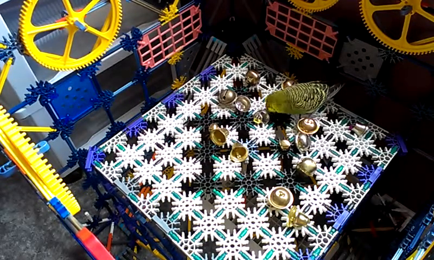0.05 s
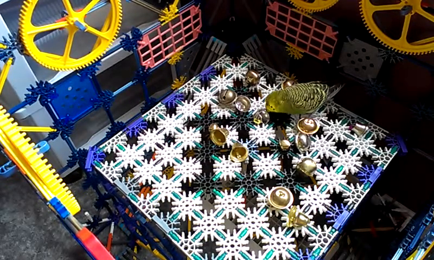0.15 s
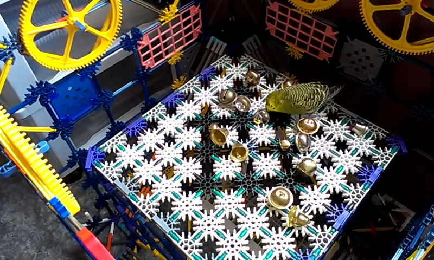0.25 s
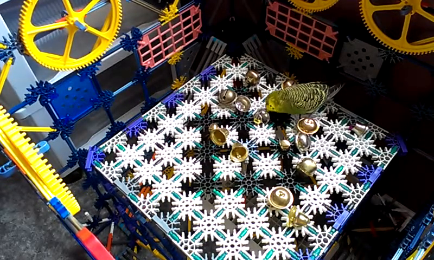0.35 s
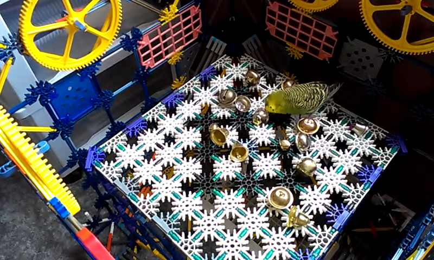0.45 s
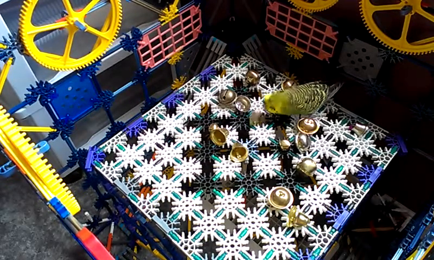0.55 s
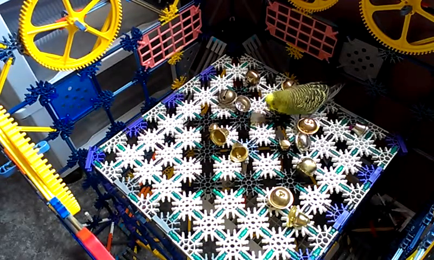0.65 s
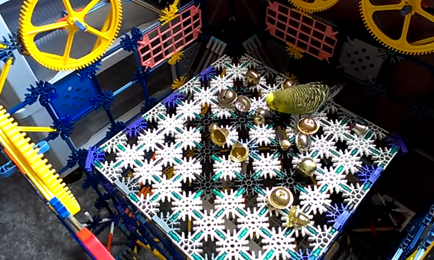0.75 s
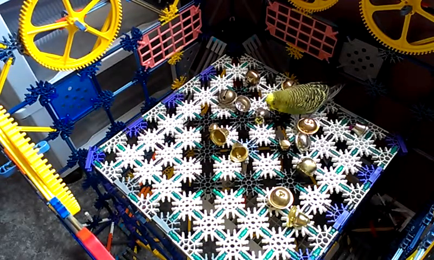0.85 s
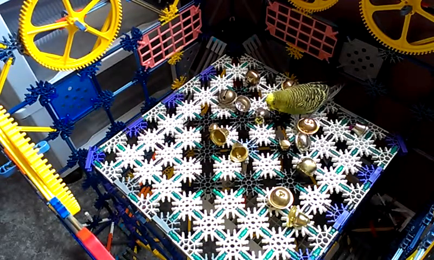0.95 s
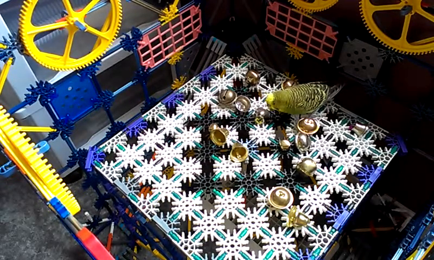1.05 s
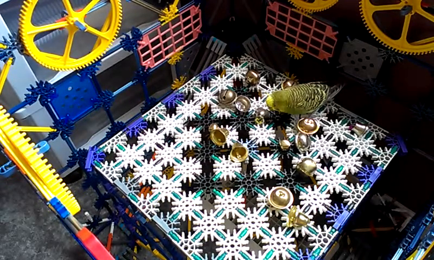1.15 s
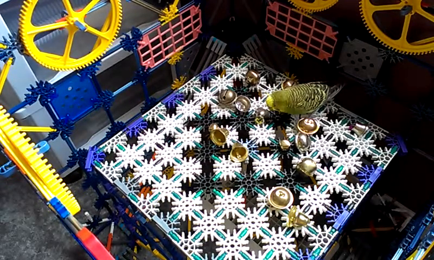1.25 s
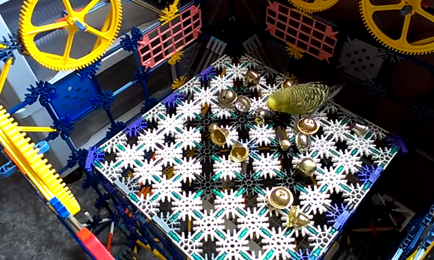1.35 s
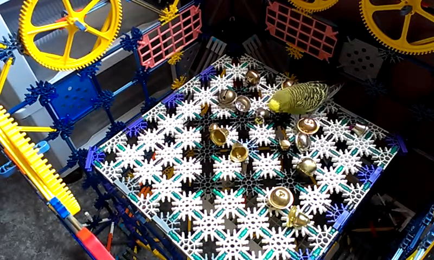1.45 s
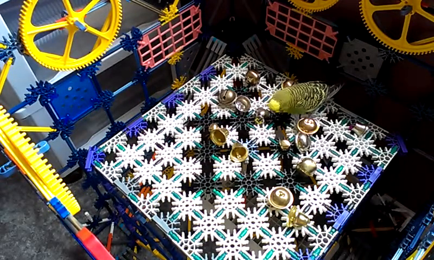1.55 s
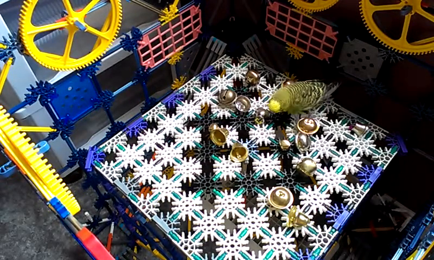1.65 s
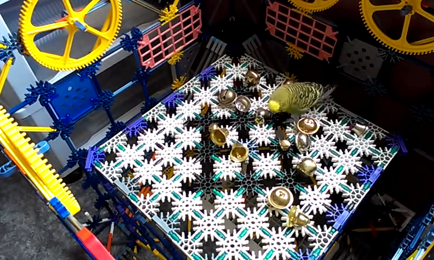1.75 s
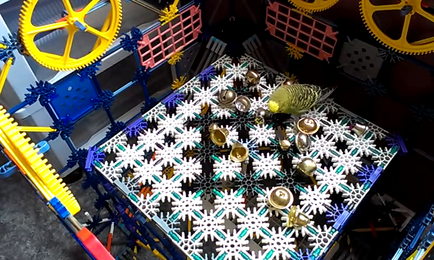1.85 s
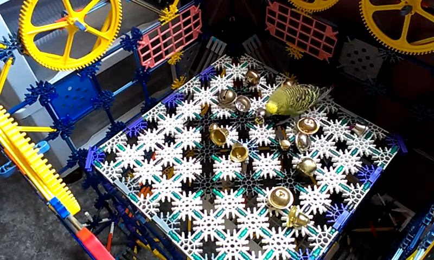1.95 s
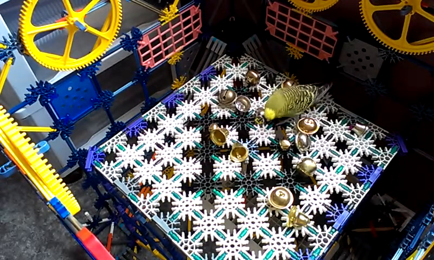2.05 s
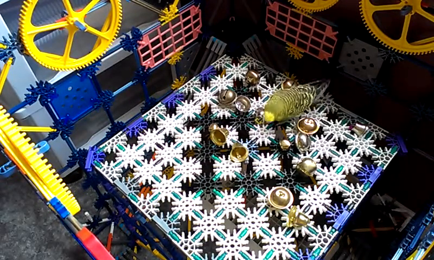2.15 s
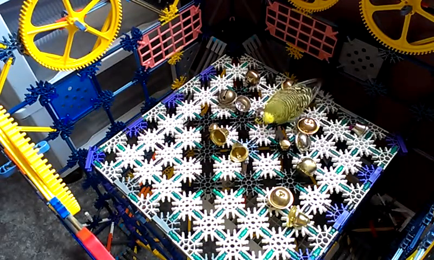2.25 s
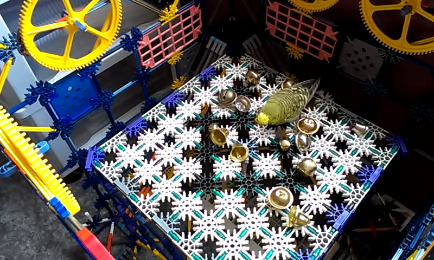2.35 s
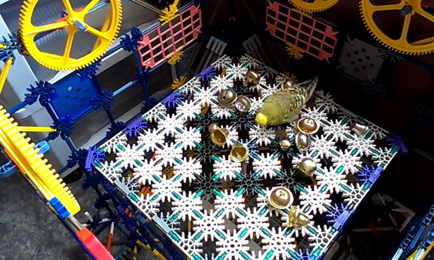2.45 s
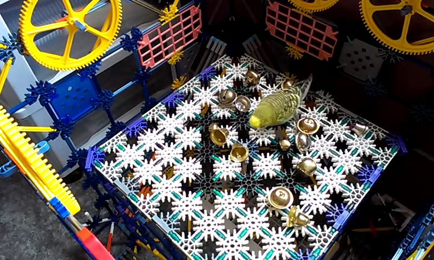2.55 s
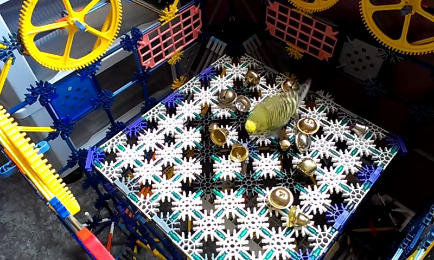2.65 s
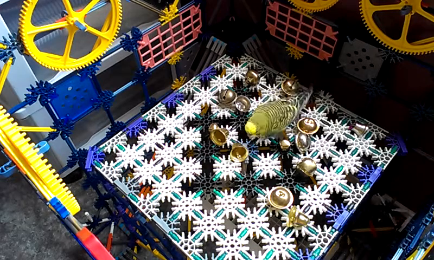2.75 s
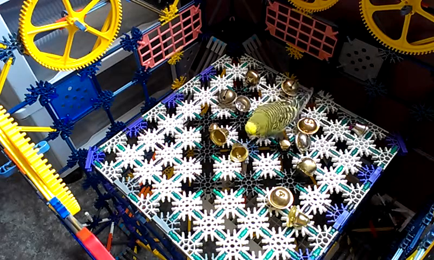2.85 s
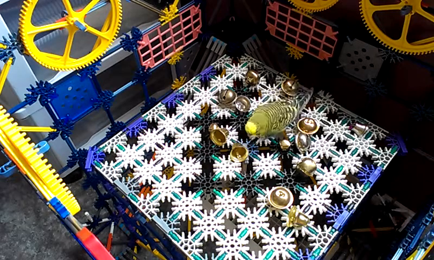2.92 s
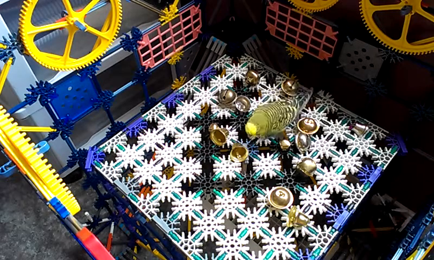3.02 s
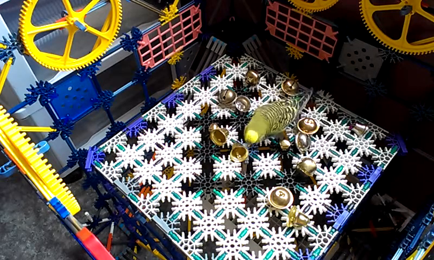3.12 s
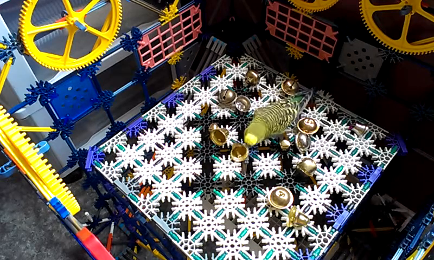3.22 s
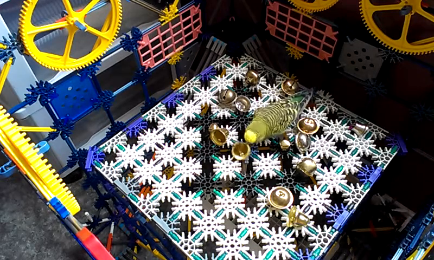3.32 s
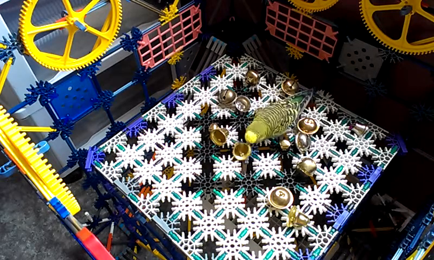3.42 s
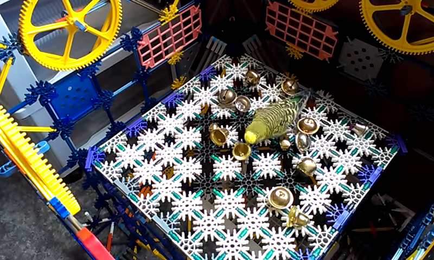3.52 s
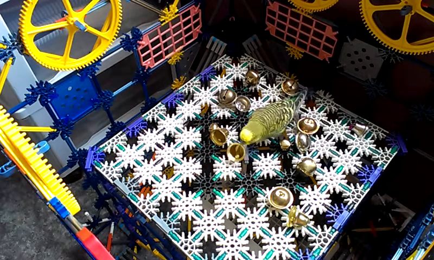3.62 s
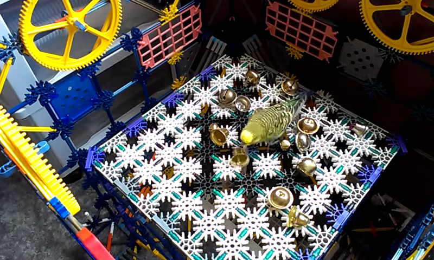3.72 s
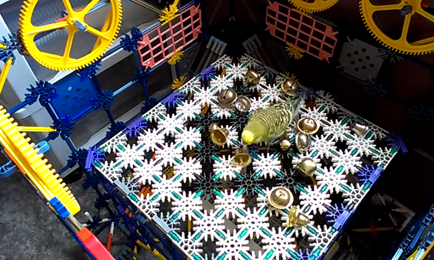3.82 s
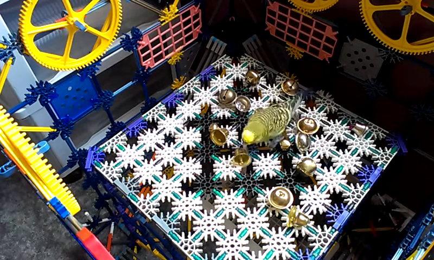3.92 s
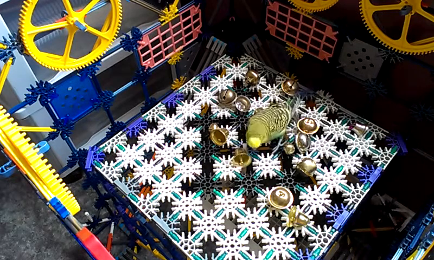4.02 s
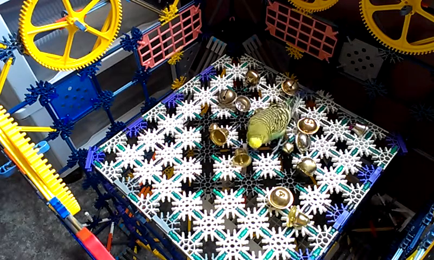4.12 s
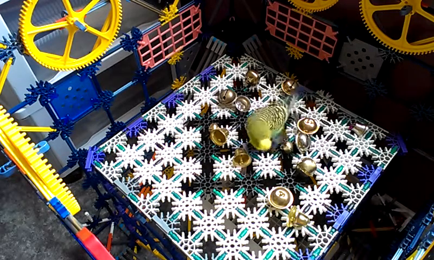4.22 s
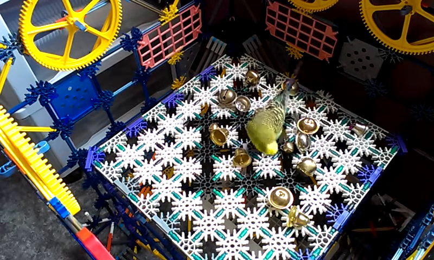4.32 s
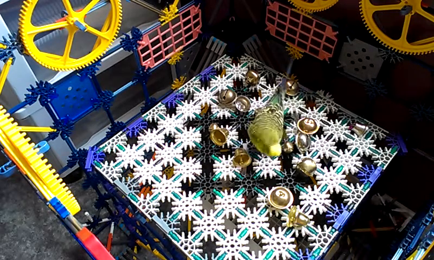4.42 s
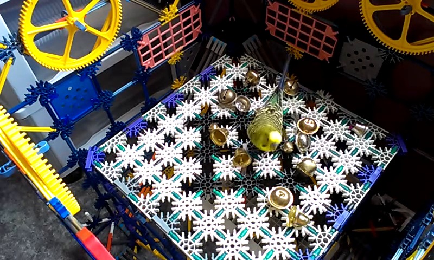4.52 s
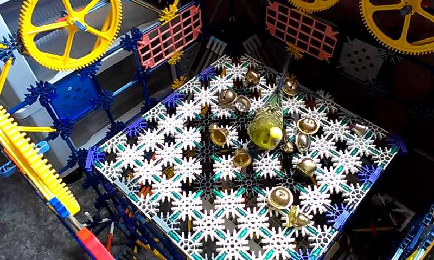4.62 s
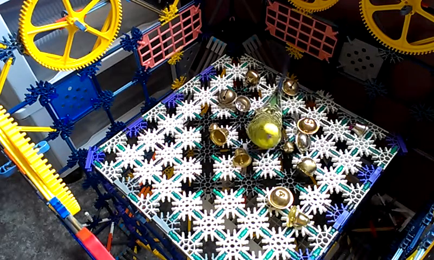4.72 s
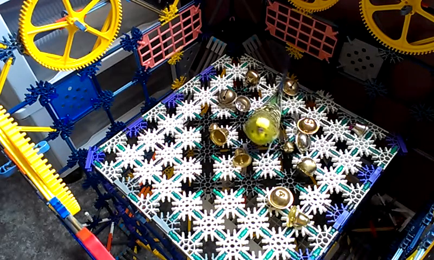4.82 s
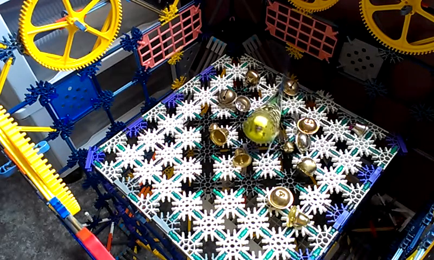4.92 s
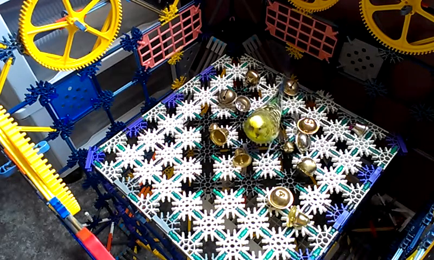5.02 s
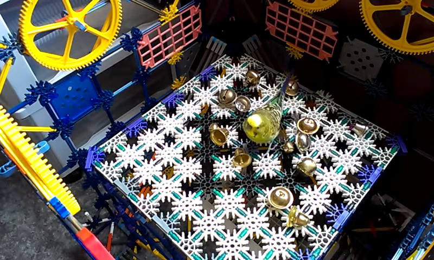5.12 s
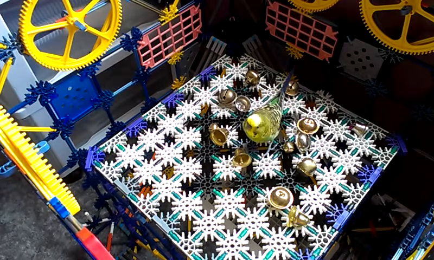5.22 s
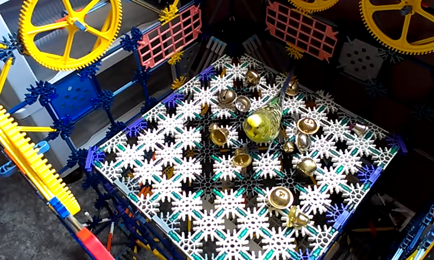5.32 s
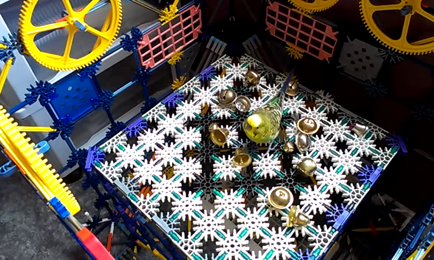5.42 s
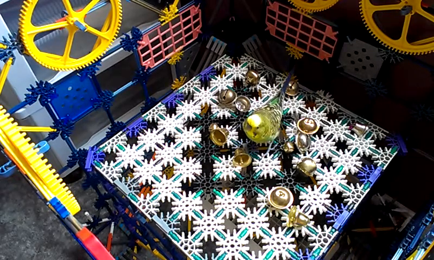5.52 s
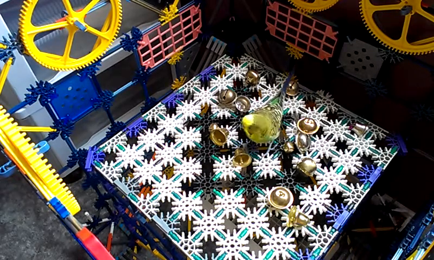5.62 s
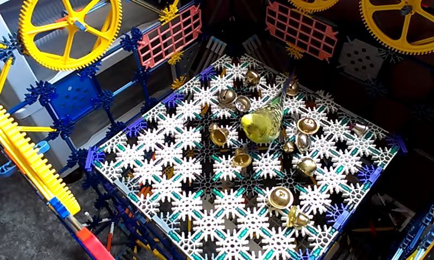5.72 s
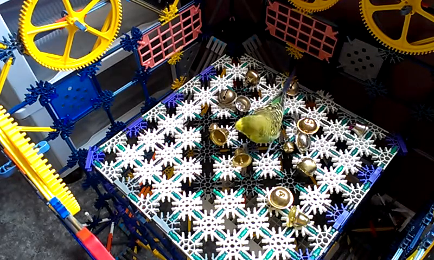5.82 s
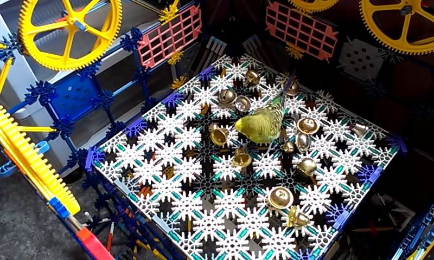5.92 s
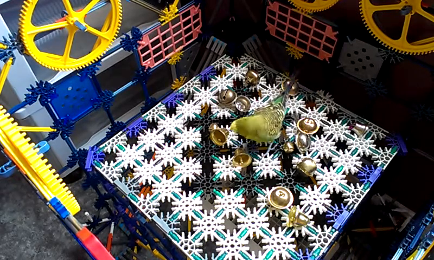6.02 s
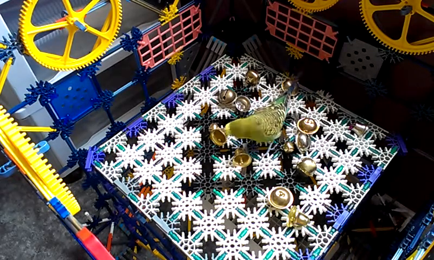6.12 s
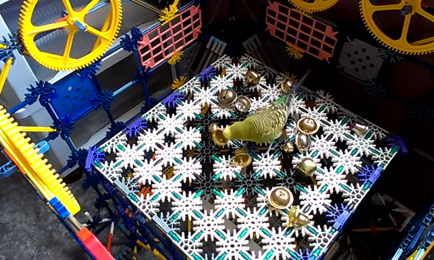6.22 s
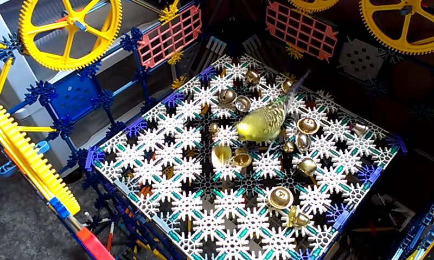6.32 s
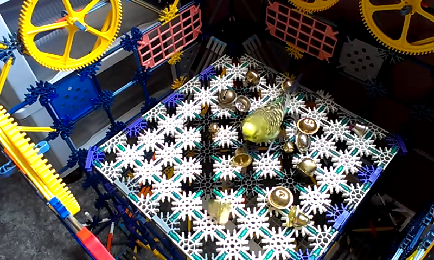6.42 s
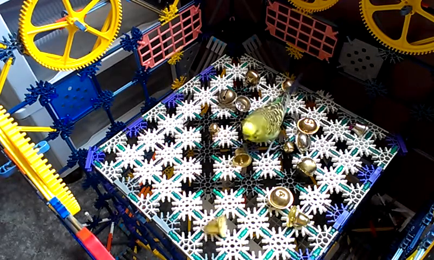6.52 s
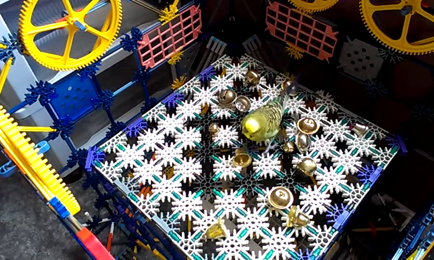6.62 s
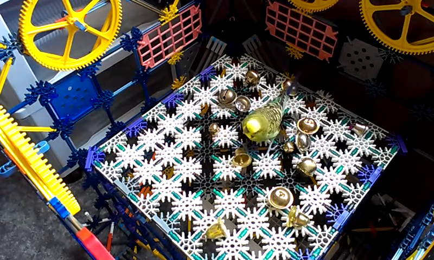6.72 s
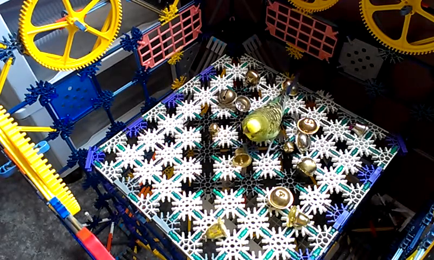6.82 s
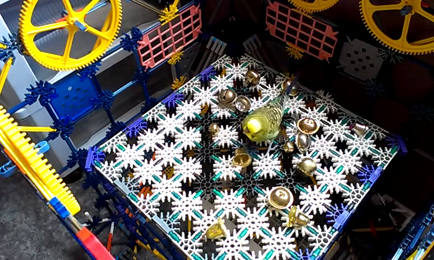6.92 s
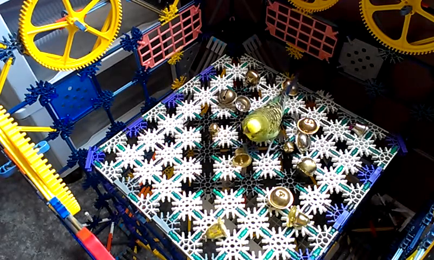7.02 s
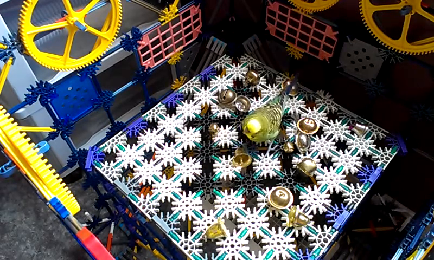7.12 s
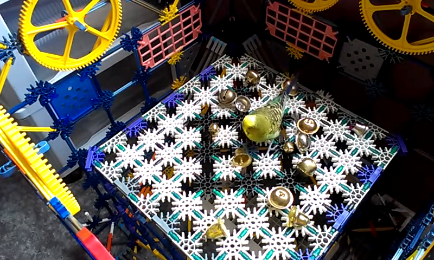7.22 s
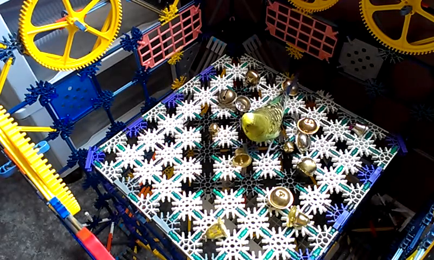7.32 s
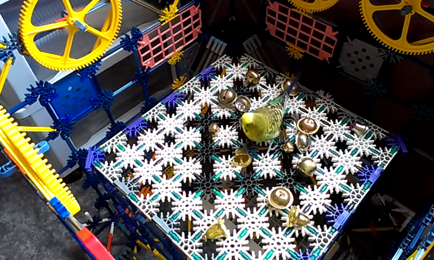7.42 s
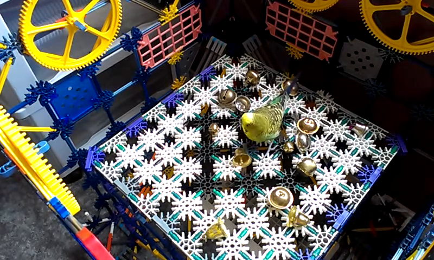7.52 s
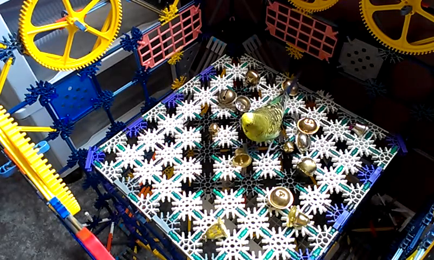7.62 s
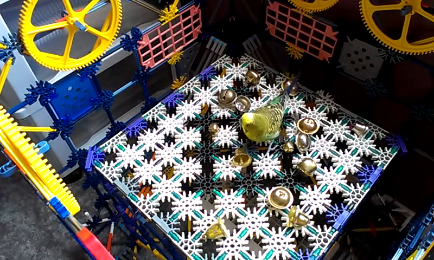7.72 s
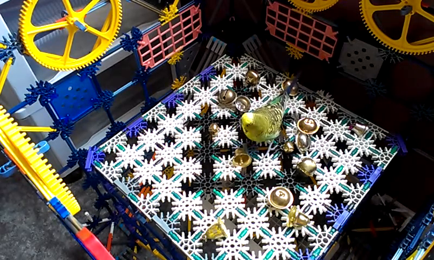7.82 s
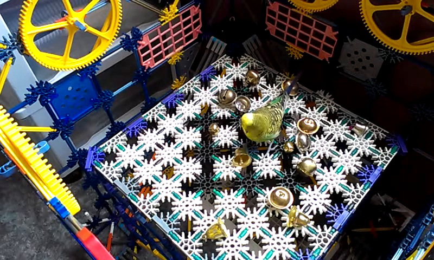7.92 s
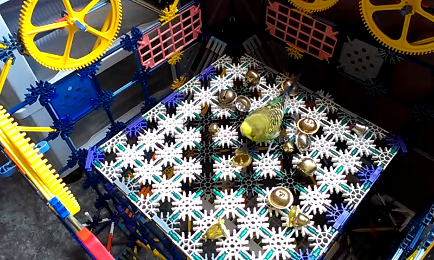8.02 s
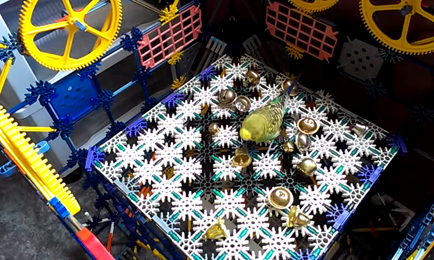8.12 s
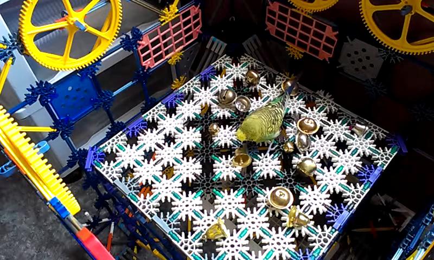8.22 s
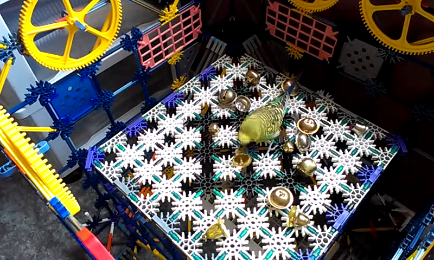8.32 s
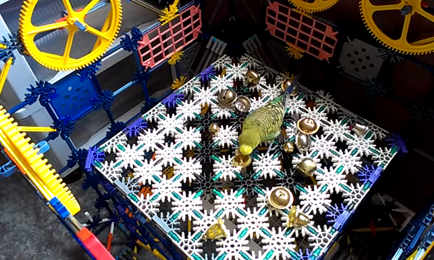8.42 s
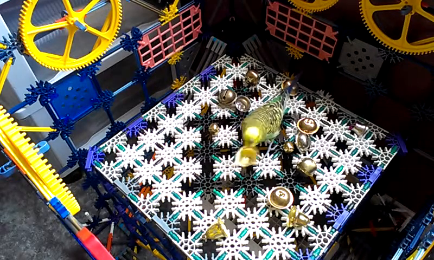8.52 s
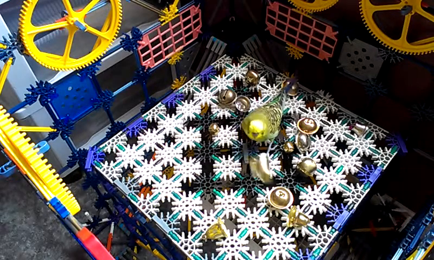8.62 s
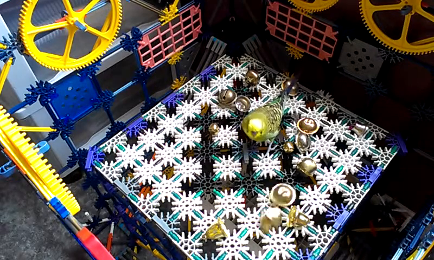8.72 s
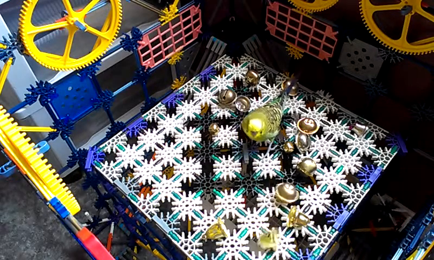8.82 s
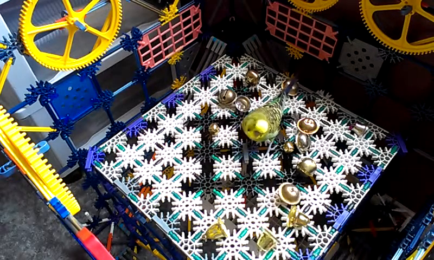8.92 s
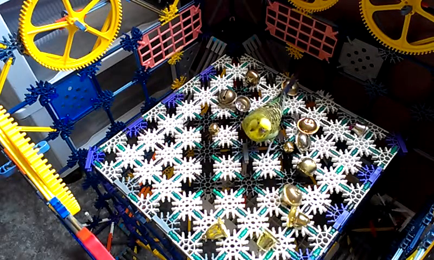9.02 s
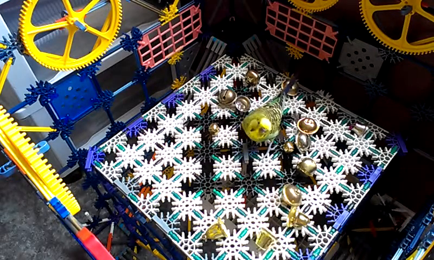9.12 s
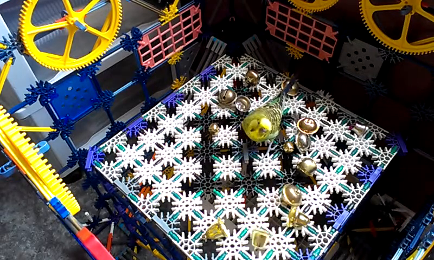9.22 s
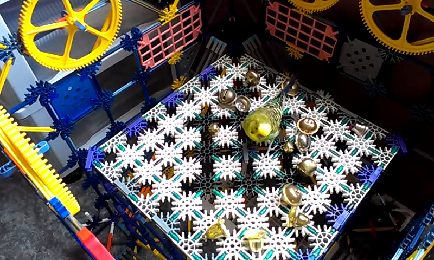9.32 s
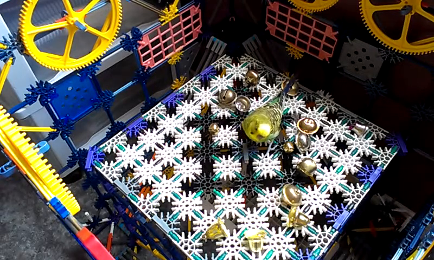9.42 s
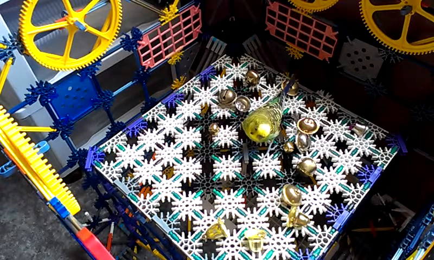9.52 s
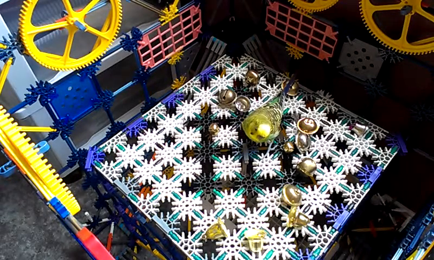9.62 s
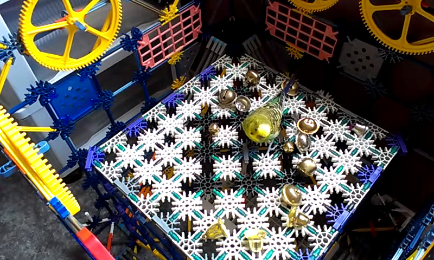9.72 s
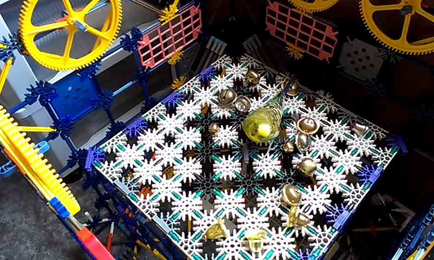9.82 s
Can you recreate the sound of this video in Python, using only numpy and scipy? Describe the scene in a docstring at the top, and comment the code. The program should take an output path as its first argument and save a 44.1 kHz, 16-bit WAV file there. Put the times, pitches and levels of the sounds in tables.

```python
"""A quiet room hushes and hums, and soon a small parrot knocks little brass bells about on a hollow plastic grid.
Each knock is a noise tick, a grainy clatter of the grid and a dull thump; heavy landings shake the frame.
Brass clinks are spikes with a short fizz. Three round pellet bells tinkle short and two open bells ring in
beating pairs, all as fading sine waves. Far traffic is a wavering rush with a drone that swells and fades."""
import sys
import numpy as np
from scipy import signal
from scipy.fft import rfft, irfft, next_fast_len
from scipy.io import wavfile
from scipy.ndimage import uniform_filter1d

SR = 44100
rng = np.random.default_rng(int(sys.argv[2]) if len(sys.argv) > 2 else 0)


def unload_audio(sound):
    """Save the sound as a 16-bit wav file, at the path given as the first command line argument."""
    columns = np.transpose(np.atleast_2d(sound))
    # keep every value between -1 and 1, then stretch to whole-number steps
    steps = np.round(np.clip(columns, -1, 1) * 32767)
    wavfile.write(sys.argv[1], SR, steps.astype(np.int16))


N = 434826
LEAD_S = .002  # room ahead of each hit, because shaping its tone also smears it backwards


def undb(db):
    """Turn decibels into a plain loudness factor."""
    return 10 ** (np.asarray(db) / 20)


def level(x, db):
    """Scale x so that its average (RMS) level is db."""
    return x * undb(db) / np.sqrt(np.mean(x ** 2))


def fade(t, t60_s):
    """Die away smoothly, by 60 dB in t60_s seconds."""
    return np.exp(-np.log(1000) * t / t60_s)


def colour(x, points, tilt_db=0.):
    """Shape x by (pitch_hz, level_db) points, tilted by tilt_db per octave about 6 kHz."""
    octave = np.log2(np.maximum(np.fft.rfftfreq(len(x), 1 / SR), 1) / 6000)
    hz, db = np.transpose(points)
    shape_db = np.interp(octave, np.log2(hz / 6000), db)
    slope_db = tilt_db * np.maximum(octave, -2)  # the tilt levels off below 1500 Hz
    return irfft(rfft(x) * undb(shape_db + slope_db), len(x))


def add(out, s, x):
    """Mix x into out from time s in seconds."""
    i = int(s * SR)
    out[i:i + len(x)] += x[:N - i]


def walk(rate):
    """Wander at random: draw rate levels a second, hold each, then smooth twice; spread near 1."""
    k = int(SR / rate)
    steps = np.repeat(rng.standard_normal(N // k + 1), k)
    return 1.3 * uniform_filter1d(uniform_filter1d(steps, k), k)[:N]


def background():
    """Steady hush, a wavering hum, and far traffic: shaped noise with a sine drone."""
    # tone of the hush: pitch_hz [Hz], relative level_db [dB]
    hush_tone = [(28, -29.5), (48, -4), (60, -3), (82, -5.5), (327, -14), (379, -14.5), (483, -16.5),
                 (767, -16), (3720, -22.5), (13500, -28.5), (16000, -32)]
    # far traffic over time: start_s [s], rush_db [dB], drone_hz [Hz], drone_db [dB], before random wandering
    traffic = [(0, -81, 96.4, -91), (2.4, -75.5, 97.2, -92), (3, -79, 97.7, -71), (3.5, -72.5, 95.8, -77.5),
               (4.2, -72, 98, -76), (5, -71, 93, -71), (5.4, -71.5, 91.2, -68), (5.9, -73.5, 90, -94),
               (7, -74, 91.3, -84.5), (9.86, -73.5, 89.7, -82.5)]
    s, *columns = np.transpose(traffic)
    rush_db, drone_hz, drone_db = (np.interp(np.arange(N) / SR, s, c) for c in columns)
    noise = rng.standard_normal((2, next_fast_len(N)))
    hush = level(colour(noise[0], hush_tone)[:N], -68.5)
    rush_tone = [(40, -7.0), (100, -6.0), (800, -4.5), (1500, -11.0), (3000, -46)]
    rush = level(colour(noise[1], rush_tone)[:N], 0) * undb(rush_db + walk(2.3))
    # pitch and loudness of both low tones wander; summing the pitch gives the wave's phase
    hum_hz = 35 + 2 * walk(9)
    hum = np.sin(2 * np.pi * np.cumsum(hum_hz) / SR) * undb(-69 + 4.0 * walk(7))
    wandering_hz = drone_hz + 1.176 * walk(5)
    drone = np.sin(2 * np.pi * np.cumsum(wandering_hz) / SR) * undb(drone_db + 3.4 * walk(6.9))
    return hush + rush + hum + drone


def knocks():
    """A sharp tick, then the grid rattles in uneven grains and its hollow frame thumps."""
    # knocks on the grid: start_s [s], level_db of the clatter before its fades [dB], tilt_db [dB per octave]
    knock_list = [(0.2182, -58, -10), (0.2538, -62, 1), (0.399, -61, -1), (0.518, -64, 0),
                  (0.5481, -49.5, -2), (0.5634, -57, 0), (0.5885, -45, -1), (0.6533, -41, 1),
                  (0.66, -41.5, 0), (0.677, -47, 1), (0.7502, -53.5, -3), (0.7842, -48.5, -3),
                  (0.819, -47, 2), (0.839, -42.5, 8), (0.8514, -50.5, -4.5), (0.8772, -61, 4),
                  (0.9304, -61, 5), (0.9458, -70, 2), (0.969, -62.5, 4), (1.949, -56, 7), (2.519, -61, 3),
                  (2.7215, -52, -1.5), (3.2747, -61, 1), (3.3592, -47.5, 0.5), (3.3851, -56, -1),
                  (3.5414, -60, 2), (3.6261, -55, -1), (3.6537, -48.5, -8.5), (3.6955, -45, -5),
                  (3.7269, -40, -3.5), (3.7437, -38, 2), (3.7888, -50, -4.5), (4.041, -57, 1),
                  (4.0877, -60, 0), (4.101, -52, 3), (4.1579, -60, 0), (4.287, -66, 5), (4.3465, -56, 13),
                  (4.7007, -61, 0), (6.2423, -61, 2), (6.342, -62, -4), (6.4536, -41, 5),
                  (6.4644, -28, 2.5), (6.4732, -27, 5), (6.499, -35.5, 2.5), (6.536, -37, 6),
                  (6.552, -45, 5), (6.5837, -48, 3), (6.6212, -54.5, 0.5), (6.7026, -58.5, 5),
                  (8.5071, -62, -2), (8.5509, -64, -1), (8.583, -57.5, -1.5), (8.6597, -60.5, 4),
                  (8.7767, -20, -2.5), (8.8056, -26, 4), (8.8198, -38, 1), (8.831, -29.5, 5.5),
                  (8.8752, -35.5, 0.5), (8.9202, -36, 4), (8.9437, -46.5, 0), (8.9917, -48.5, -2),
                  (9.021, -49, -7), (9.0488, -42.5, 6), (9.04, -52, -2), (9.0825, -48.5, -4),
                  (9.1083, -47, 16), (9.1604, -54.5, 3), (9.2732, -54, 2.5), (9.295, -55.5, -2),
                  (9.3277, -53, 1), (9.3508, -56, 4), (9.377, -48.5, 3.5), (9.3857, -47.5, -3),
                  (9.4135, -53.5, 0)]
    # tone of the grid, for tick and clatter: pitch_hz [Hz], relative level_db [dB]
    grid_tone = [(400, -53), (1300, -20.5), (2200, -2), (3000, 1), (4500, 1.5), (6300, 4), (7600, 3),
                 (9000, -3.5), (12000, -6.5), (14000, -4.5), (16000, -21)]
    # tone of the hollow frame: pitch_hz [Hz], relative level_db [dB]
    thump_tone = [(40, -37), (90, -1), (200, -2.5), (400, 0), (1000, -2), (2000, -10), (4000, -33)]
    tick_db = 4  # tick peak above level_db
    out, t = np.zeros(N), np.arange(8192) / SR - LEAD_S
    after = np.maximum(t, 0)
    for s, db, tilt_db in knock_list:
        noise = rng.standard_normal((5, len(t)))
        tick = (1 + .4 * noise[0]) * np.exp(-after / .00004) * (t >= 0)
        tick = colour(tick, grid_tone, tilt_db)
        tick = undb(db + tick_db) * tick / np.abs(tick).max()

        grains = undb(3.3 * level(uniform_filter1d(noise[3], size=60), 0))
        rattle = colour(noise[1] * grains, grid_tone, tilt_db)
        # every spot of the grid favours other resonances
        spot = 5 + rfft(noise[4, :160] * np.exp(-np.arange(160) / 40), len(t))
        clatter = level(irfft(rfft(rattle) * spot), db)
        # the clatter starts bright and dulls within a few milliseconds
        dull = colour(clatter, [(8000, -2.5), (16000, -6)])
        clatter = dull + (clatter - dull) * np.exp(-after / 0.003)
        clatter = clatter * fade(after, .12) * (1 - np.exp(-after / 0.0011))

        # the frame answers a little late and grows less than the blow: 0.51 dB per dB of clatter
        thump = level(colour(noise[2], thump_tone), -37.5 + 0.51 * db)
        thump = thump * fade(after, .15) * (1 - np.exp(-after / 0.00057))
        add(out, s - LEAD_S, tick + clatter + thump)
    return out


def room(x):
    """Walls send back a short, dull, diffuse tail: fading noise smeared over the sound."""
    t = np.arange(int(.5 * SR)) / SR
    tail = colour(rng.standard_normal(len(t)), [(200, 0.0), (3000, -4), (12000, -8)])
    tail = tail * fade(t, .22) * (t > .004)
    room_db = -17
    return signal.fftconvolve(x, tail / np.sqrt(np.sum(tail ** 2)))[:N] * undb(room_db)


def ring_bells(strikes, shelf, rise_s, muffle_s, spread_db, detune, rough_db):
    """Each strike lands elsewhere on the wall and sets the modes going afresh; contact muffles the last ring."""
    out, t = np.zeros(N), np.arange(16384) / SR
    next_starts = [row[0] for row in strikes[1:]] + [np.inf]
    for (s, low_db, high_db), next_s in zip(strikes, next_starts):
        modes = next(modes for until_s, modes in shelf if s < until_s)
        hz, db, t60_s = np.transpose(modes)[:, :, None]
        chance = rng.standard_normal((2, *hz.shape))
        strike_db = np.where(hz > 5500, high_db, low_db)
        gain = undb(db + strike_db + spread_db * chance[0])
        # each mode flutters on its own, as a loose pellet keeps brushing the wall of a round bell
        flutter = uniform_filter1d(rng.standard_normal((len(hz), len(t))), size=200, axis=1)
        gain = gain * undb(rough_db * level(flutter, 0))
        mode_hz = hz * (1 + detune * chance[1])
        ring = np.sum(gain * np.sin(2 * np.pi * mode_hz * t) * fade(t, t60_s), axis=0)
        muffle = np.exp(-np.maximum(t + s - next_s, 0) / muffle_s)
        add(out, s, ring * (1 - np.exp(-t / rise_s)) * muffle)
    return out


def round_bells():
    """A loose pellet strikes inside a closed round bell, whose many modes die quickly and roughly."""
    # pellet strikes: start_s [s], low_db [dB] and high_db [dB] for modes below and above 5500 Hz
    pellet_strikes = [(0.5504, -62, -68), (0.5906, -48.5, -53), (0.6564, -59, -51.5), (0.6764, -45, -56),
                      (0.6994, -50, -58), (0.7517, -53, -62), (0.7846, -59, -59), (0.821, -41, -52),
                      (0.8494, -56, -53), (2.7212, -66, -65), (4.0133, -57, -67), (4.0427, -63, -60.5),
                      (4.0886, -64, -63), (4.1106, -53, -50), (4.1195, -51, -51), (4.1304, -52, -55),
                      (4.1584, -59, -59), (4.3444, -70, -62), (4.3999, -58, -70), (4.6119, -64, -77),
                      (5.0489, -72, -66), (8.5839, -78, -67), (8.7799, -28.5, -31), (8.8717, -44, -43.5),
                      (8.9226, -54, -47), (8.973, -55, -50.5), (8.993, -57, -62), (9.0209, -54, -50),
                      (9.0488, -38, -45.5), (9.0833, -50, -44.5), (9.1102, -38, -46), (9.1227, -44, -54),
                      (9.1601, -46.5, -48.5), (9.3267, -72, -60)]
    # modes of each bell, before chance shifts: pitch_hz [Hz], relative level_db [dB], t60_s (60 dB fade) [s]
    first_round = [(3890, -10, .05), (4415, 0, .11), (4490, -5, .06), (6290, 0, .05), (6640, 0, .05),
                   (7600, -3, .05), (10580, -4, .08), (11500, -9, .09), (15110, -3, .11)]
    second_round = [(2990, -7, .04), (3850, 0, .08), (3940, -3, .07), (5700, 0, .02), (6300, 4, .025),
                    (8210, -8, .1), (8420, -6, .07), (9520, -7, .07), (11400, 0, .12), (12900, -10, .08),
                    (15120, 0, .1), (15480, -1, .08)]
    third_round = [(2420, -8, .03), (2900, -10, .025), (3430, -2, .09), (3530, 0, .035), (6315, -2, .12),
                   (6700, 0, .08), (6770, -4, .05), (11700, -12, .04), (14070, -17, .1)]
    shelf = [(3, first_round), (6, second_round), (10, third_round)]  # (until_s, bell in play)
    return ring_bells(pellet_strikes, shelf, .001, .003, spread_db=2.5, detune=.002, rough_db=4.0)


def clinks():
    """Brass on brass: a hard one-sample spike with a brief bright fizz of noise."""
    # clinks: start_s [s], peak level_db [dB]
    clink_list = [(0.591, -34), (4.12, -32), (4.1311, -40), (6.4647, -14.5), (6.475, -12), (6.5368, -13.5),
                  (8.7766, -15.5), (8.7808, -14), (8.8056, -23), (8.8335, -12.5), (9.0489, -28),
                  (9.0835, -29), (9.11, -38), (9.1597, -41)]
    # tone of a clink: pitch_hz [Hz], relative level_db [dB]
    clink_tone = [(2000, -30.5), (4500, -8), (6500, 1), (10000, -3), (13000, -17), (16000, -29)]
    fizz_db, fizz_t60_s = -16.5, 0.0088  # fizz against the spike, before shaping
    out, t = np.zeros(N), np.arange(2048) / SR - LEAD_S
    for s, db in clink_list:
        fizz = undb(fizz_db) * rng.standard_normal(len(t)) * fade(np.maximum(t, 0), fizz_t60_s)
        spike = t < 1 / SR
        clink = colour((fizz + spike) * (t >= 0), clink_tone)
        add(out, s - LEAD_S, undb(db) * clink / np.abs(clink).max())
    return out


def landings():
    """Heavy landings: the whole frame shudders in a low, slow rattle of shaped noise."""
    # landings: start_s [s], level_db before rise and fade [dB]
    landing_list = [(0.6563, -53), (0.8515, -60), (2.7231, -60), (3.37, -62), (3.7432, -51.5),
                    (6.4644, -49), (6.536, -52.5), (8.831, -53), (9.3862, -56)]
    # tone of the shaken frame: pitch_hz [Hz], relative level_db [dB]
    landing_tone = [(40, -25), (150, 6), (400, -0.5), (1300, -1), (2200, -9), (4000, -24.5)]
    rise_s, t60_s = 0.002, 0.24
    out, t = np.zeros(N), np.arange(16384) / SR
    for s, db in landing_list:
        shudder = level(colour(rng.standard_normal(len(t)), landing_tone), db)
        add(out, s, shudder * fade(t, t60_s) * (1 - np.exp(-t / rise_s)))
    return out


def open_bells():
    """A clapper strikes an open bell, whose modes lie close together, so they beat as they ring."""
    # clapper strikes: start_s [s], low_db [dB] and high_db [dB] for modes below and above 5500 Hz
    clapper_strikes = [(3.7284, -46, -42), (3.7454, -34, -28.5), (3.7614, -43, -33.5), (3.7788, -41, -47),
                       (3.7944, -59.5, -61), (6.4737, -32.5, -41), (6.4934, -35, -36.5),
                       (6.5131, -31.5, -43), (6.5354, -33.5, -39), (6.5524, -38.5, -37.5),
                       (6.5844, -50, -60), (6.6144, -55, -64), (6.66, -71, -76), (8.7764, -29.5, -29),
                       (8.7819, -22, -27.5), (8.7914, -34.5, -19), (8.8054, -25.5, -27), (8.8218, -21, -44),
                       (8.8324, -29, -30), (8.8474, -28, -47), (8.8744, -32.5, -34), (8.9206, -40, -41),
                       (8.9494, -51, -57), (8.9894, -75, -65), (9.2948, -66, -73)]
    # modes of each bell, before chance shifts: pitch_hz [Hz], relative level_db [dB], t60_s (60 dB fade) [s]
    first_open = [(5025, -4, .3), (5100, 0, .4), (5126, -8, .4), (12243, 0, .3), (12292, -14, .25)]
    second_open = [(5005, -2, .35), (5052, 0, .33), (12139, 0, .3), (12172, -5, .25)]
    shelf = [(5, first_open), (7, second_open), (10, first_open)]  # (until_s, bell in play)
    return ring_bells(clapper_strikes, shelf, .002, .003, spread_db=1.0, detune=.0003, rough_db=.6)


def scene():
    """Add the room's echo to the nearby sounds and lay them over the background."""
    near = knocks() + round_bells() + clinks() + landings() + open_bells()
    return (near + room(near) + background())[None]


def record(dry):
    """Cut the very top of the treble, steeply above 15900 Hz."""
    low_pass = signal.ellip(10, .2, 80, 15900, fs=SR, output="sos")
    return signal.sosfilt(low_pass, dry)


dry = scene()
out = record(dry)
unload_audio(out)
```